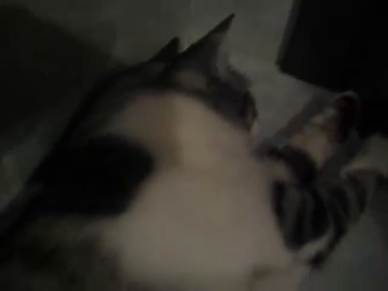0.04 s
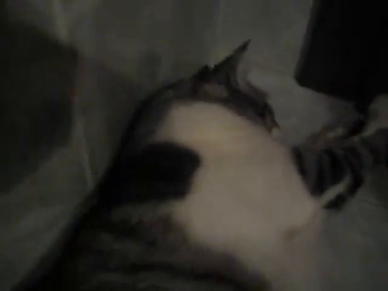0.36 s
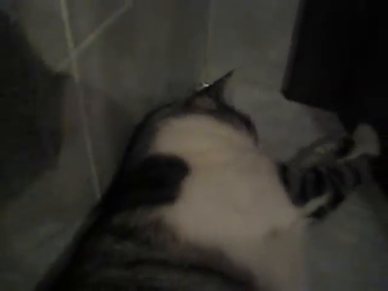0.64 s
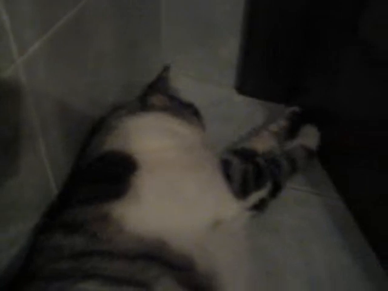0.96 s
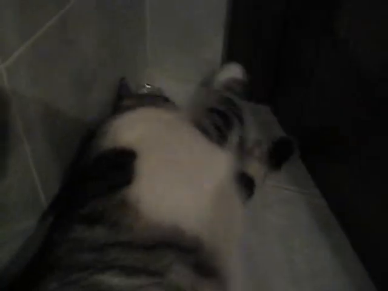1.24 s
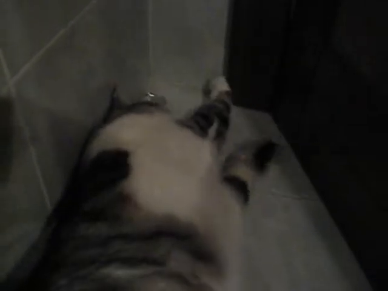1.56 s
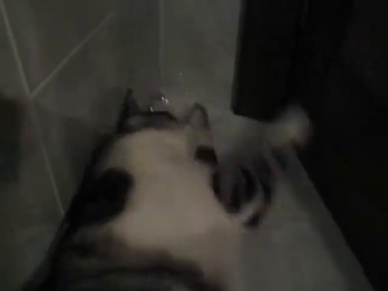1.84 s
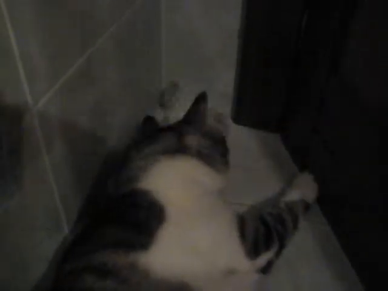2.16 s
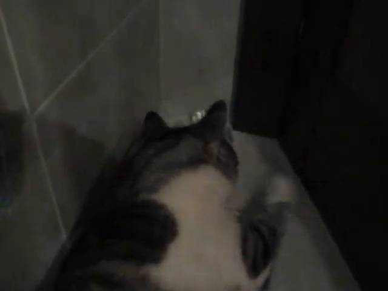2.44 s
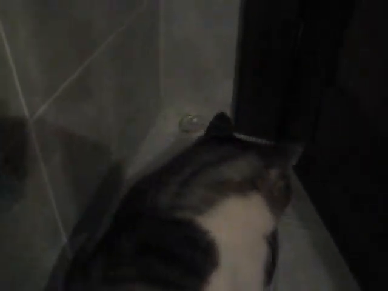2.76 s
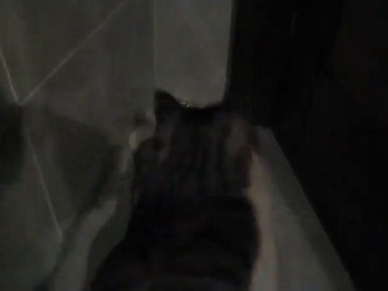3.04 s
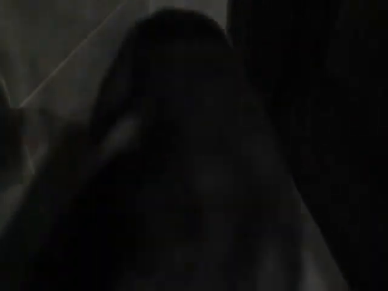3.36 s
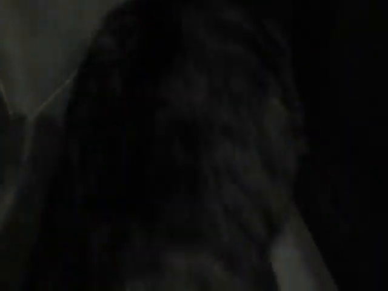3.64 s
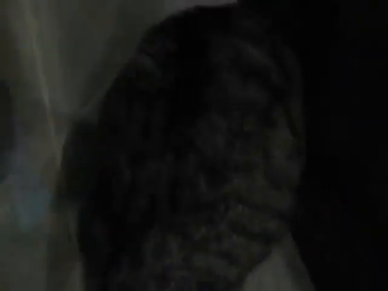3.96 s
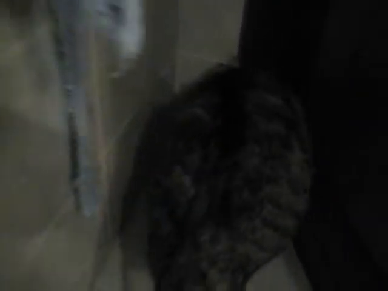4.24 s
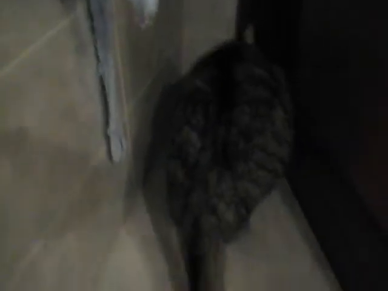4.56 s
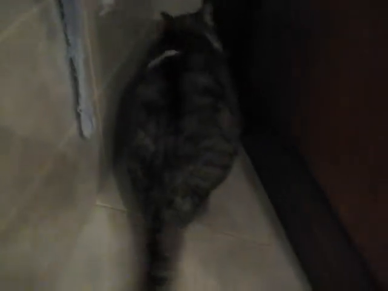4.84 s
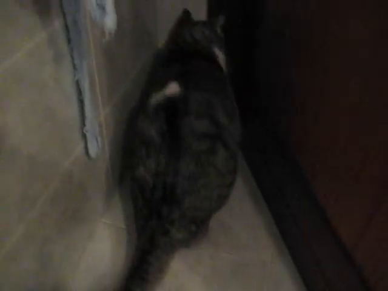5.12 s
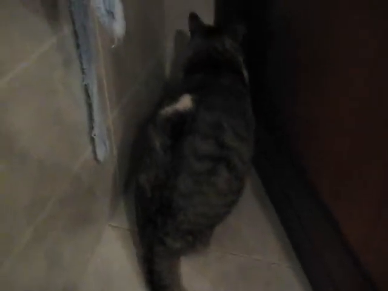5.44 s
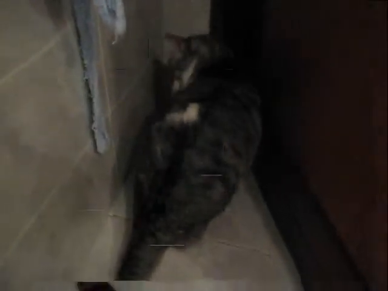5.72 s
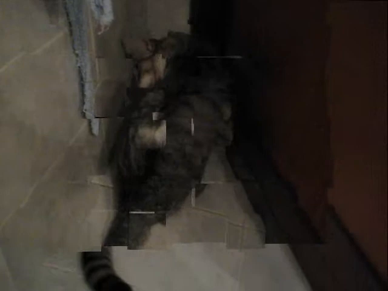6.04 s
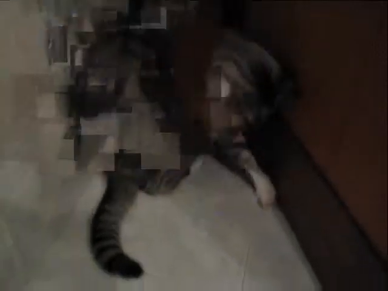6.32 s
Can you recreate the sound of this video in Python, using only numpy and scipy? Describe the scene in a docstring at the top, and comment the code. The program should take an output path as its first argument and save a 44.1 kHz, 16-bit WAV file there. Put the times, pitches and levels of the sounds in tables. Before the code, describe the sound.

Claws knock and scrape on hollow wood, then a cat sets a small metal object jingling and drags it, over faint hiss.

```python
"""Over a faint hiss, a cat's pads brush a wooden door in a small tiled room, among a few dry taps.
The door rocks in its frame, and the claws knock and scrape, exciting the panel's hollow resonances.
Something small and metal, like a bunch of keys, is batted about, with two dull thumps, then dragged.
Impacts are brief pulses of force and friction is a train of tiny slips; both drive the damped modes
of wood and metal. The tiles reflect it all, and the loudest clinks softly overload a close microphone."""
import sys
import numpy as np
from scipy import signal
from scipy.fft import rfft, irfft
from scipy.io import wavfile
from scipy.ndimage import uniform_filter1d

SR = 44100
rng = np.random.default_rng(int(sys.argv[2]) if len(sys.argv) > 2 else 0)


def master_out(mix):
    """Clip the mix to full scale and print it as 16-bit PCM to the path in sys.argv[1]."""
    frames = np.transpose(np.atleast_2d(mix))
    ceiling = np.clip(frames, -1, 1)
    pcm = np.round(ceiling * 32767).astype(np.int16)
    wavfile.write(sys.argv[1], SR, pcm)


N = 290178

# Levels in the tables are relative; t60 is the time a vibration takes to decay by 60 dB.
# spectrum of the hiss: f/Hz, level/dB
HISS_SPECTRUM = [(15, -31), (25, -4), (48, -21), (69, -5.5), (340, -9), (410, -7.5), (598, -9), (666, -7.5),
                 (1270, -9.5), (1530, -11), (2230, -12.5), (7100, -16), (7700, -18), (12200, -20),
                 (15500, -17)]
# narrow bands of hum and whine: f/Hz, width/Hz, level/dB
WHINE_BANDS = [(39.9, 3.3, -66), (7640, 29, -70), (15135, 40, -100)]
# pads brushing along: t/s, duration/s, level/dB, centre f/Hz
PAD_BRUSHES = [(0.224, 0.053, -39.5, 4170), (0.482, 0.088, -38.5, 4300), (0.777, .125, -36.5, 4500),
               (.918, 0.068, -33.5, 970), (.95, 0.22, -45, 1010), (2.838, .25, -46, 8000),
               (4.463, 0.25, -38.5, 1610)]
# friction spectrum of pads and fur: f/Hz, level/dB
FUR_SPECTRUM = [(80, -23), (400, 16), (900, 13.5), (2000, 7), (3500, 7), (7500, 6.5), (10000, -0.5),
                (15000, -15)]
# dry taps, and two dull low thumps under the loudest clinks: t/s, level/dB, centre f/Hz
TAPS_AND_THUMPS = [(0.231, -19.5, 5230), (.921, -9, 1020), (0.9281, -3.5, 1700), (2.088, -25, 197),
                   (2.3605, -16, 180), (4.494, -19, 2020), (4.576, -20, 3020), (4.642, -15, 1750),
                   (5.884, -25.5, 1160), (6.293, -24.5, 990), (6.422, -26, 1210)]
# impact spectrum of the taps and thumps: f/Hz, level/dB
TAP_SPECTRUM = [(60, 1.5), (300, -4), (900, 0), (1600, -0.5), (2800, -2), (5000, -11), (9000, -17),
                (15000, -22)]
# reverberation time of the room: f/Hz, t60/s
ROOM_DECAY = [(100, 0.91), (500, 0.62), (2000, 0.87), (6000, 0.42), (15000, 0.21)]
# pushes that rock the door: t/s, level/dB, centre f/Hz
DOOR_PUSHES = [(0.927, -33.5, 166), (4.291, -34, 116), (4.644, -39, 197)]
# low modes of the door in its frame: f/Hz, level/dB, t60/s
FRAME_MODES = [(68.3, -2, 0.64), (103.2, -5, 0.72), (140, 7, 0.15), (178.7, -3, 0.18), (246.5, -2, 0.33),
               (364, 4, 0.21)]
# claws striking the door: t/s, level/dB, centre f/Hz, coupling to the panel/dB
CLAW_KNOCKS = [(1.293, -4.5, 3300, -0.5), (1.521, -14, 2890, -10), (1.643, -18, 3520, -23),
               (4.242, -8, 2380, -4), (4.251, -25, 2200, 5)]
# claws dragged down the door: t/s, duration/s, level/dB, centre f/Hz, coupling to the panel/dB
CLAW_SCRATCHES = [(1.302, 0.043, -35.5, 900, 2.5), (1.518, 0.048, -50.5, 690, 15),
                  (1.606, 0.066, -55, 3030, 7), (4.246, 0.054, -29, 2880, 1.5)]
# contact spectrum of claw on wood: f/Hz, level/dB
CLAW_SPECTRUM = [(100, -10.5), (350, 0.5), (750, -3.5), (1300, -4), (2200, -2), (4500, -1), (7000, -9.5),
                 (15000, -24)]
# modes of the door panel: f/Hz, gain/dB, t60/s
PANEL_MODES = [(333, 10, .12), (385.5, 19, .19), (435, 13, .068), (500, 16, .12), (594.5, 16.5, .2),
               (704, 15, .2), (818, 7, .2), (1005, 2, .27), (1980, 3, .048), (2100, 4, .062),
               (2600, -3, .22), (4540, 1, .041)]
# a metal piece landing on one edge, then the other:
# t/s, level/dB, note f/Hz, gap/s, second contact re first/dB, coupling to the modes/dB
METAL_CLINKS = [(1.799, -4, 5230, .0065, -1, 3), (1.9627, 0.5, 2840, 0.01, -2.5, -5.5),
                (1.98, -2, 4950, 0.0082, 0, -6), (2.002, -8.5, 8750, .02, -13, 7.5),
                (2.077, -0.5, 4720, .0085, 0.5, 7.5), (2.1105, -1, 3980, 0.0055, -1.5, -12),
                (2.137, -5.5, 7950, 0.011, -2.5, 7.5), (2.2723, -2, 2056, 0.00116, -9, -2),
                (2.344, -5.5, 4950, .016, 6, 5), (2.379, -8, 5570, 0.021, 7, 5.5),
                (2.408, 0.5, 5180, .012, -19, -9), (2.483, -6, 6900, 0.023, -3, 11),
                (2.547, -3, 5020, 0.0025, -20, -16), (2.581, -12, 8650, 0.039, 1, -17),
                (3.822, -28, 7900, 0.0076, 5, -4), (3.942, -22, 1900, 0.034, -10, 6),
                (4.068, -32, 7460, 0.0027, -11, -15), (4.143, -33.5, 8100, .016, -5, -15),
                (4.274, -38, 2600, 0.024, 7, 4), (5.811, -25.5, 9450, 0.015, -18, -6),
                (5.902, -21, 9200, 0.0093, -5, -16), (5.993, -18, 9800, 0.037, 0, 6.5),
                (6.095, -21.5, 6150, 0.0084, -4, 9.5), (6.133, -17, 8700, 0.0096, 7.5, -10),
                (6.255, -7, 9360, 0.015, -1.5, -20), (6.457, -13, 9700, 0.0043, 0, -16),
                (6.555, -24, 9200, 0.014, 0, -12)]
# metal sliding on metal: t/s, duration/s, level/dB, note f/Hz
METAL_SLIDES = [(1.794, 0.027, -19.5, 6500), (1.821, 0.062, -31, 5430), (1.874, 0.092, -24, 8500),
                (2.064, .05, -28, 4900), (2.15, 0.14, -39, 4100), (2.473, 0.057, -16.5, 7000),
                (2.576, 0.032, -23, 7300), (2.61, 0.049, -26.5, 6750), (3.817, 0.027, -25, 6340),
                (3.834, 0.26, -35, 10200), (3.898, 0.16, -38, 2250), (5.984, 0.063, -27, 6030),
                (6.393, 0.039, -23.5, 3340)]
# contact spectrum of the metal: f/Hz, level/dB
METAL_SPECTRUM = [(150, 20.5), (900, -6.5), (1400, -5.5), (2000, -1), (3000, -2.5), (5000, 0.5), (9000, 2),
                  (12000, -2.5), (15500, -10.5)]
# modes of the metal pieces: f/Hz, gain/dB, t60/s
METAL_MODES = [(1945, 6.5, .12), (2085, 7, .17), (2490, 5.5, .26), (2642, 4, .28), (2762, -1, .16),
               (3110, -4, .22), (3375, -1, .22), (3811, -3, .12), (4085, -1, .16), (4186, 1, .2),
               (4362, 1, .22), (4663, 0, .12), (5015, 3, .15), (5250, 1, .12), (5456, 3, .13),
               (6050, -2, .12), (7062, 2, .1), (7560, -3, .12), (8290, 1, .18), (8800, 0, .16),
               (9440, -1, .1), (10200, -2, .1)]
# course of the metal's drag: t/s, level/dB, note f/Hz
DRAG_COURSE = [(5.8, -44.5, 8140), (5.978, -45.5, 9130), (6.046, -49, 6260), (6.134, -39, 8700),
               (6.292, -37.5, 8710), (6.318, -37.5, 6700), (6.394, -29, 6260), (6.45, -29.5, 8700),
               (6.516, -28.5, 7740), (6.548, -30, 9300), (6.58, -24, 8750)]
# friction spectrum of the drag: f/Hz, level/dB
RASP_SPECTRUM = [(150, -34), (1000, 26), (2500, -12), (3200, 2), (4200, -10.5), (6000, -4), (9500, -4),
                 (11500, -9), (13000, -16), (15500, -43)]


def amp(db):
    """Amplitude ratio: tenfold for every 20 dB."""
    return 10 ** (np.asarray(db) / 20)


def unit_rms(x):
    """Normalisation to unit mean power."""
    return x / np.sqrt(np.mean(x ** 2) + 1e-20)


def curve_at(points, hz):
    """Interpolation along a logarithmic frequency axis."""
    f, value = np.transpose(points)
    return np.interp(np.log(hz + 1), np.log(f + 1), value)


def add(mix, s, sound):
    """Superposition: a sound joins the mix at time s."""
    part = mix[round(s * SR):][:len(sound)]
    part += sound[:len(part)]


def background():
    """Stationary noise: a broad band is heard as hiss, narrow bands as hum and electronic whine."""
    hz = np.fft.rfftfreq(N, 1 / SR)
    noise = rfft(rng.standard_normal(N))
    low_cut = hz ** 2 / np.sqrt(hz ** 4 + 36 ** 4)
    out = amp(-45.5) * unit_rms(irfft(noise * low_cut * amp(curve_at(HISS_SPECTRUM, hz)), N))
    for line_hz, width, db in WHINE_BANDS:
        band = np.exp(-(2 * (hz - line_hz) / width) ** 2)
        out += amp(db) * unit_rms(irfft(noise * band, N))
    return out


def colour(x, spectrum, centre_hz, focus_db, size=2048):
    """Minimum-phase filtering by a material's spectrum; positive focus_db narrows it about the centre."""
    hz = np.fft.rfftfreq(size, 1 / SR)
    octaves = np.log2((hz + 1) / centre_hz)
    db = curve_at(spectrum, hz) - focus_db * octaves ** 2 / np.sqrt(1 + (octaves / 2) ** 2)
    log_gain = np.log(amp(np.maximum(db, -100)))
    log_gain = np.r_[log_gain, log_gain[-2:0:-1]]
    response = np.fft.ifft(np.exp(np.conj(signal.hilbert(log_gain)))).real
    return signal.fftconvolve(x, response[:size // 2])


def friction(length_s, spectrum, centre_hz, focus_db, slips_per_s, spread_db, smooth, skew):
    """Stick-slip friction: tiny uneven slips over a smooth hiss swell and fade, for 1/3 s at most."""
    longest = SR // 3
    slipping = rng.random(longest) < slips_per_s / SR
    strength = amp(spread_db * np.minimum(rng.exponential(1, longest), 3))
    slips = unit_rms(slipping * strength * rng.choice([-1, 1], longest))
    force = slips + smooth * rng.standard_normal(longest)
    progress = np.linspace(0, 1, min(int(length_s * SR), longest))
    swell = np.sin(np.pi * progress ** skew)
    sound = colour(force[:len(swell)] * swell, spectrum, centre_hz, focus_db)
    return sound / np.sqrt(np.sum(sound ** 2) / len(swell))


def brushing():
    """Sliding friction of each pad; the fur around it touches earlier and longer, softer and duller."""
    out = np.zeros(N)
    for s, length_s, db, hz in PAD_BRUSHES:
        pad = friction(length_s, FUR_SPECTRUM, hz, focus_db=4,
                       slips_per_s=1400, spread_db=2.2, smooth=0.22, skew=0.89)
        fur = friction(length_s + 0.19, FUR_SPECTRUM, 0.29 * hz, focus_db=1,
                       slips_per_s=3000, spread_db=2.2, smooth=0.3, skew=0.61)
        add(out, s, amp(db - 1) * pad)
        add(out, s - 0.05, amp(db - 11) * fur)
    return out


def impact(spectrum, centre_hz, focus_db, snap_s, tail_s, tail_db, spike):
    """Impulsive excitation: a spike, a snap and a flutter between surfaces; unit rms in the first 2 ms."""
    t = np.arange(SR // 10) / SR
    envelope = np.exp(-t / snap_s) + amp(tail_db) * np.exp(-t / tail_s)
    force = rng.standard_normal(len(t)) * envelope
    force[0] += spike
    sound = colour(force, spectrum, centre_hz, focus_db)
    return sound / np.sqrt(np.mean(sound[:SR // 500] ** 2))


def taps_and_thumps():
    """Heavily damped transients: dry taps, and two dull low thumps under the loudest clinks."""
    out = np.zeros(N)
    for s, db, hz in TAPS_AND_THUMPS:
        tap = impact(TAP_SPECTRUM, hz, focus_db=2.5, snap_s=0.00067, tail_s=0.0038, tail_db=-3.5, spike=3.4)
        add(out, s, amp(db - 8) * tap)
    return out


def room(x):
    """Reverberation: sparse reflections off the tiles, with the treble absorbed first."""
    echoes_per_s = 3000
    echoes = rng.choice([-1., 1.], SR // 2) * (rng.random(SR // 2) < echoes_per_s / SR)
    echoes[:SR // 300] = 0  # travel time of the first reflection
    hz, t, bands = signal.stft(echoes, SR, nperseg=256)
    decay = amp(-60 * t / curve_at(ROOM_DECAY, hz)[:, None])
    tail = signal.istft(bands * decay, SR, nperseg=256)[1]
    return signal.fftconvolve(x, tail / np.linalg.norm(tail))[:N]


def door_rocking():
    """Damped free vibration: each push sets the door swinging in its frame."""
    out = np.zeros(N)
    t = np.arange(SR) / SR
    onset = 1 - np.exp(-t / 0.012)
    for s, push_db, centre_hz in DOOR_PUSHES:
        for hz, db, t60 in FRAME_MODES:
            missed_db = 7 * np.log2(hz / centre_hz) ** 2  # modes far from the push stay quiet
            swing = onset * np.sin(2 * np.pi * (hz * t + rng.random()))
            add(out, s, amp(push_db + db - missed_db - 60 * t / t60) * swing)
    return out


def resonate(force, modes):
    """Modal response: the force is convolved with a sum of decaying sinusoids."""
    t = np.arange(SR // 2) / SR
    response = np.zeros(len(t))
    for hz, db, t60 in modes:
        damping = np.log(1000) / t60
        response += amp(db) * 2 * damping / SR * np.exp(-damping * t) * np.cos(2 * np.pi * hz * t)
    return signal.fftconvolve(force, response)[:N]


def claws_on_door():
    """Forced vibration: claws strike and scrape, and the panel answers with its hollow modes."""
    direct, drive = np.zeros(N), np.zeros(N)
    for s, db, hz, panel_db in CLAW_KNOCKS + judder():
        knock = amp(db - 16.5) * impact(CLAW_SPECTRUM, hz, focus_db=0.62,
                                        snap_s=0.0016, tail_s=0.0084, tail_db=1, spike=1.7)
        add(direct, s, knock)
        add(drive, s, amp(panel_db) * knock)
    for s, length_s, db, hz, panel_db in CLAW_SCRATCHES:
        scratch = amp(db - 8) * friction(length_s, CLAW_SPECTRUM, hz, focus_db=2.5,
                                         slips_per_s=410, spread_db=4, smooth=0.17, skew=1.04)
        add(direct, s, scratch)
        add(drive, s, amp(panel_db) * scratch)
    return direct + resonate(drive, PANEL_MODES)


def judder():
    """Stick-slip oscillation: a claw's catches, as knocks that come faster and harder as the paw pulls."""
    start_s, length_s, first_gap_s, last_gap_s = 1.599, 0.075, 0.013, 0.0066
    first_db, growth_db, centre_hz, panel_db = -24, 11, 3300, 5
    catches, pull = [], 0
    while pull < 1:
        catches.append((start_s + pull * length_s, first_db + pull * growth_db, centre_hz, panel_db))
        pull += np.interp(pull, [0, 1], [first_gap_s, last_gap_s]) / length_s
    return catches


def contact_spectrum(spectrum, note_hz, note_db, width_hz, ripple_db):
    """Resonance: one main peak stands among lesser ones that differ with every contact."""
    hz = np.arange(100, 16000, 170)
    ripple = unit_rms(uniform_filter1d(rng.standard_normal(len(hz)), size=2))
    peak = note_db / (1 + ((hz - note_hz) / width_hz) ** 2)
    return np.transpose([hz, curve_at(spectrum, hz) + peak + ripple_db * ripple])


def chatter(length_s, spectrum, note_hz, note_db, focus_db, count):
    """Incoherent addition: several pieces skip along at once, each with its own resonances."""
    pieces = [contact_spectrum(spectrum, note_hz, note_db, width_hz=220, ripple_db=6)
              for _ in range(count)]
    skips = [friction(length_s, piece, note_hz, focus_db,
                      slips_per_s=220, spread_db=3.5, smooth=0.2, skew=0.74) for piece in pieces]
    return sum(skips) / np.sqrt(count)


def perturbed(modes):
    """Perturbation of modes: the way the pieces lie shifts each a little in pitch and strength."""
    shifts, strengths = rng.standard_normal((2, len(modes)))
    return [(hz * (1 + 0.004 * shift), db + 2 * strength, t60)
            for (hz, db, t60), shift, strength in zip(modes, shifts, strengths)]


def slides():
    """Frictional excitation of metal on metal; returns the contact noise and the ringing."""
    direct, ringing = np.zeros(N), np.zeros(N)
    for s, length_s, db, hz in METAL_SLIDES:
        slide = amp(db - 2) * chatter(length_s, METAL_SPECTRUM, hz, note_db=8.5, focus_db=-0.18, count=7)
        add(direct, s, slide)
        add(ringing, s, amp(-3.5) * resonate(slide, perturbed(METAL_MODES)))
    return direct, ringing


def clinks():
    """Impact excitation: a piece lands on two edges in turn; returns the contact noise and the ringing."""
    direct, ringing = np.zeros(N), np.zeros(N)
    for s, db, hz, gap_s, second_db, ring_db in METAL_CLINKS:
        drive = np.zeros(SR // 8)
        for after_s, contact_db in ((0, db), (gap_s, db + second_db)):
            edge = contact_spectrum(METAL_SPECTRUM, hz, note_db=12, width_hz=350, ripple_db=3.5)
            click = impact(edge, hz, focus_db=2.6, snap_s=0.0016, tail_s=0.014, tail_db=-13, spike=5.5)
            jolt = impact(METAL_SPECTRUM, centre_hz=2780, focus_db=2.5,
                          snap_s=0.00051, tail_s=0.0023, tail_db=-18, spike=5.5)
            add(direct, s + after_s, amp(contact_db - 7) * click)
            add(drive, after_s, amp(contact_db + ring_db - 10) * jolt)
        add(ringing, s, resonate(drive, perturbed(METAL_MODES)))
        settling = chatter(0.015, METAL_SPECTRUM, hz, note_db=0, focus_db=-2, count=3)
        add(direct, s, amp(db - 26) * settling)
    return direct, ringing


def drag():
    """Sustained friction: spells of chatter merge as the metal is pulled; returns rasp and ringing."""
    grip_s = 0.04  # a new set of edges takes over the rubbing this often
    times, db, hz = np.transpose(DRAG_COURSE)
    rasp = np.zeros(N)
    for s in np.arange(times[0], times[-1], grip_s):
        note_hz = np.interp(s + grip_s, times, hz)
        add(rasp, s, chatter(2 * grip_s, RASP_SPECTRUM, note_hz, note_db=5, focus_db=8.5, count=5))
    rasp *= amp(np.interp(np.arange(N) / SR, times, db) - 2)
    return rasp, amp(-2) * resonate(rasp, METAL_MODES)


def metal():
    """Radiation efficiency: the pieces are too small to give out the low notes of their contacts."""
    direct, ringing = np.sum([clinks(), slides(), drag()], axis=0)
    radiation = signal.butter(5, 1450, "highpass", fs=SR, output="sos")
    return signal.sosfilt(radiation, direct) + ringing


def scene():
    """Superposition of the direct sound, the reverberant field and the hiss."""
    jangle = metal()
    wood = claws_on_door() + door_rocking()
    touches = taps_and_thumps() + brushing()
    echoes = room(amp(-15.5) * (touches + jangle) + amp(-9) * wood)
    return (touches + wood + jangle + echoes + background())[None]


def record(dry):
    """Saturation and band limiting: the microphone rounds the loudest clinks; the top treble is cut."""
    ceiling, edge_hz = 0.72, 15600
    saturated = dry / (1 + (dry / ceiling) ** 4) ** (1 / 4)
    lowpass = signal.firwin(511, edge_hz, window=("kaiser", 9), fs=SR)
    return signal.oaconvolve(saturated, lowpass[None], "same")


dry = scene()
out = record(dry)
master_out(out)
```